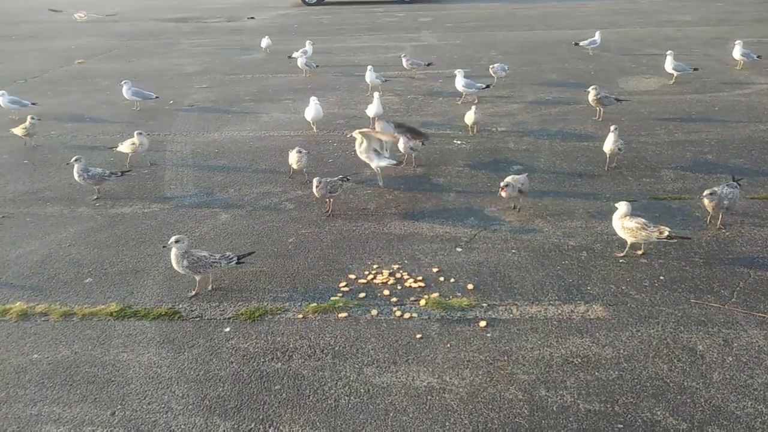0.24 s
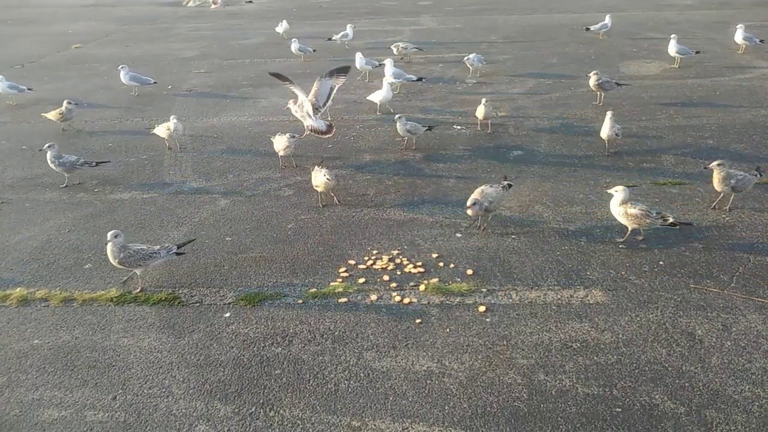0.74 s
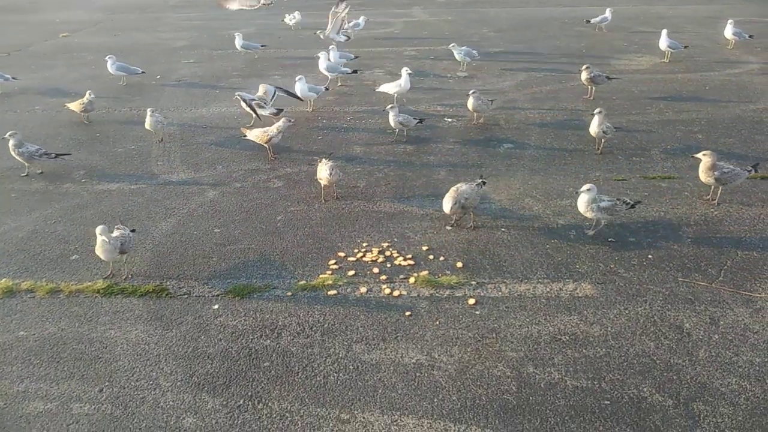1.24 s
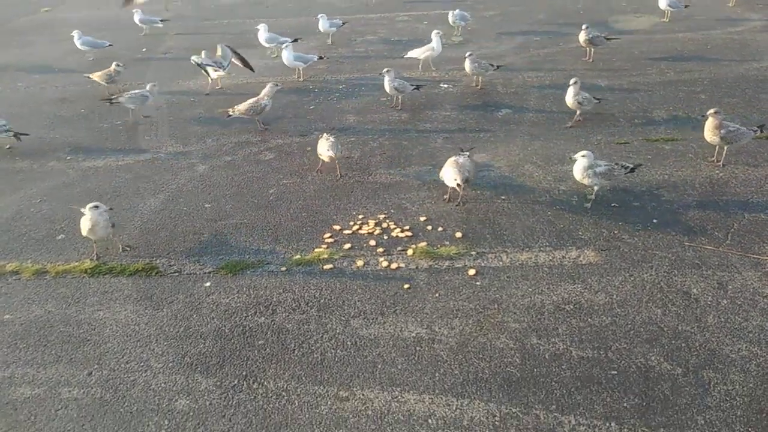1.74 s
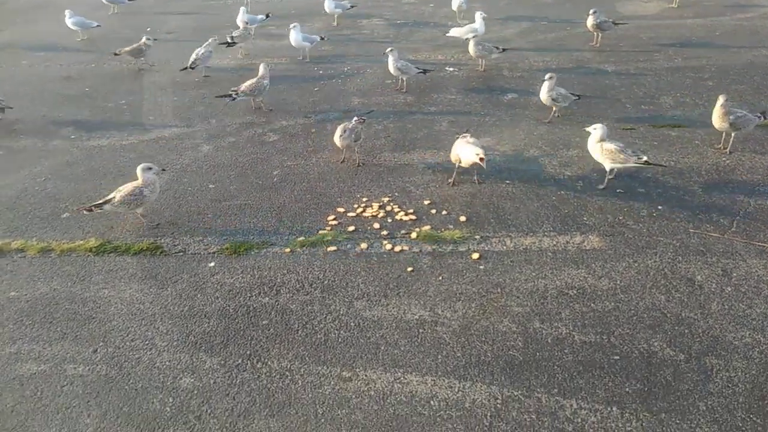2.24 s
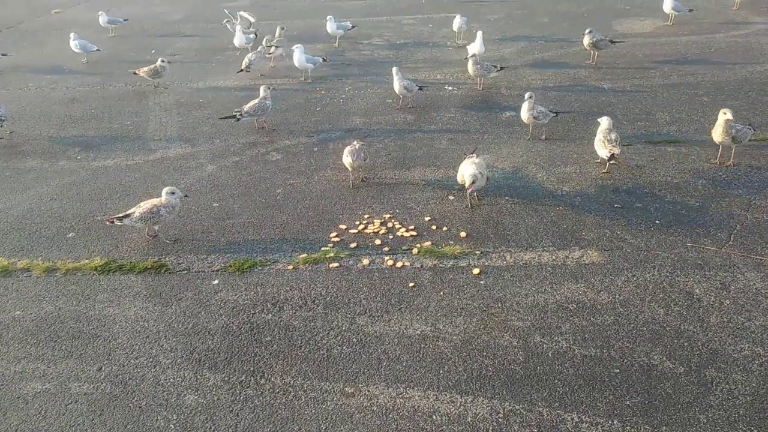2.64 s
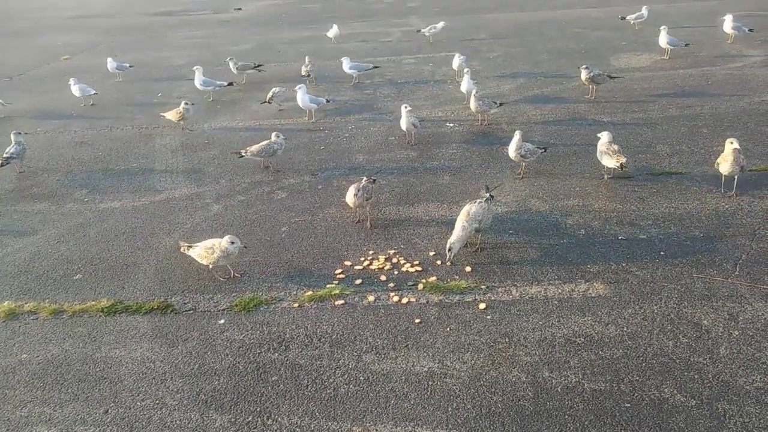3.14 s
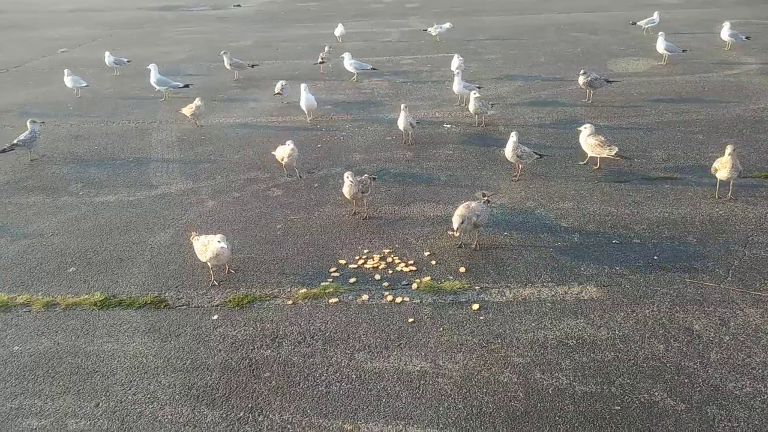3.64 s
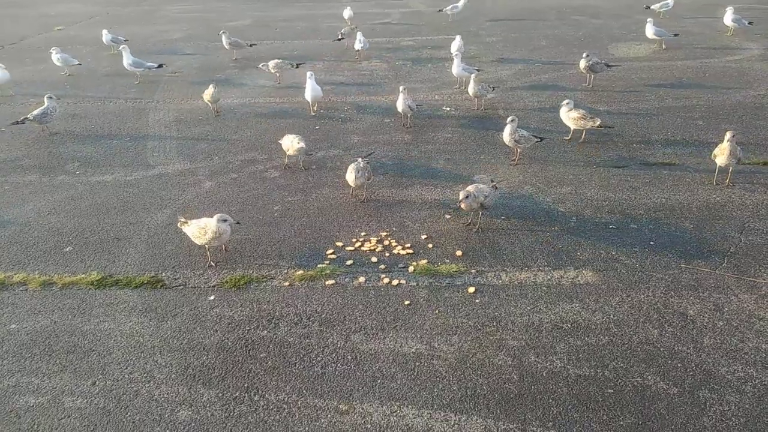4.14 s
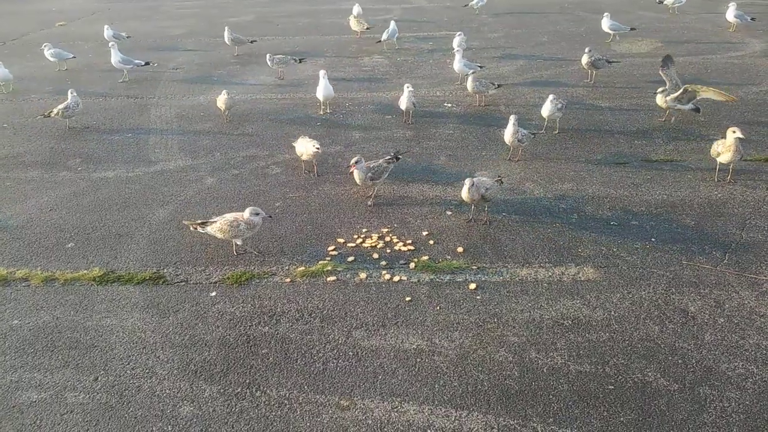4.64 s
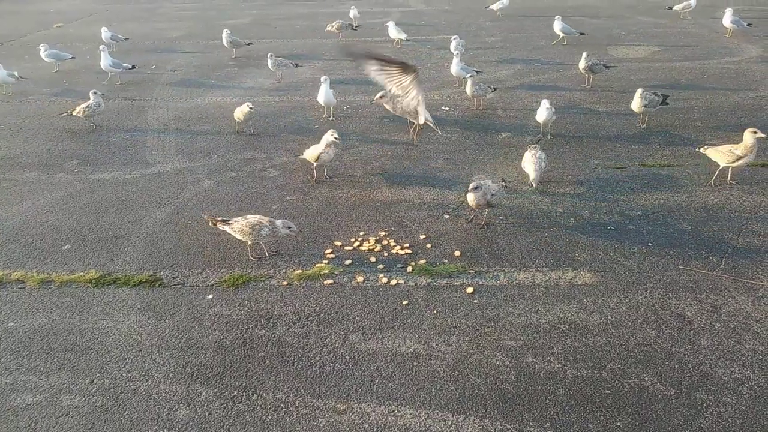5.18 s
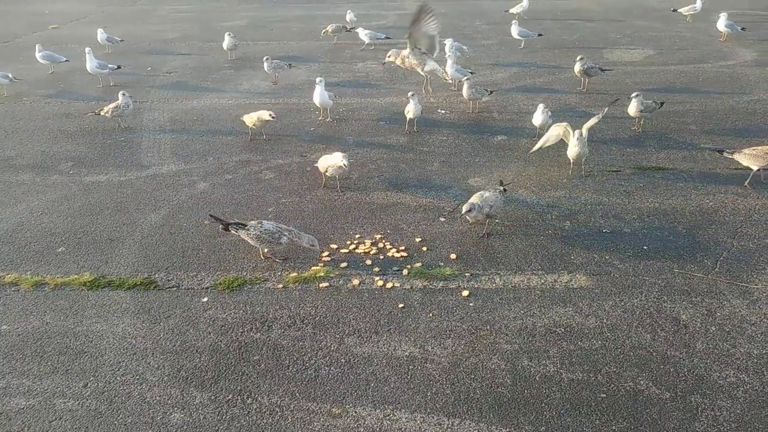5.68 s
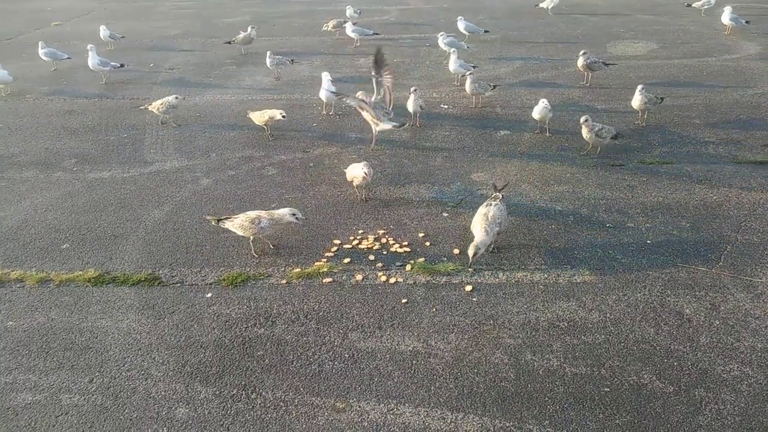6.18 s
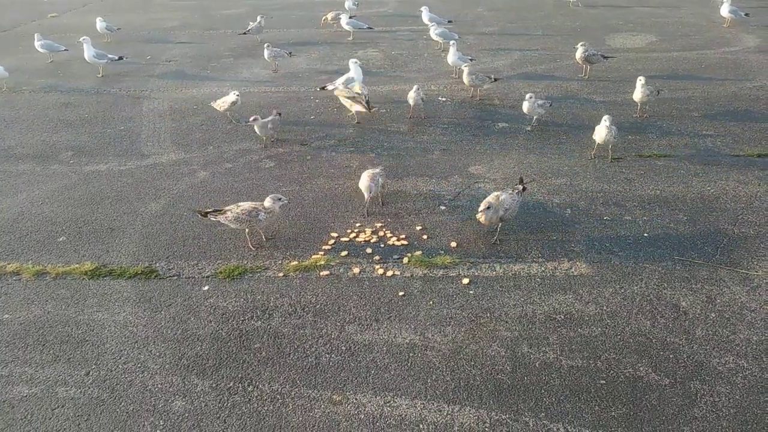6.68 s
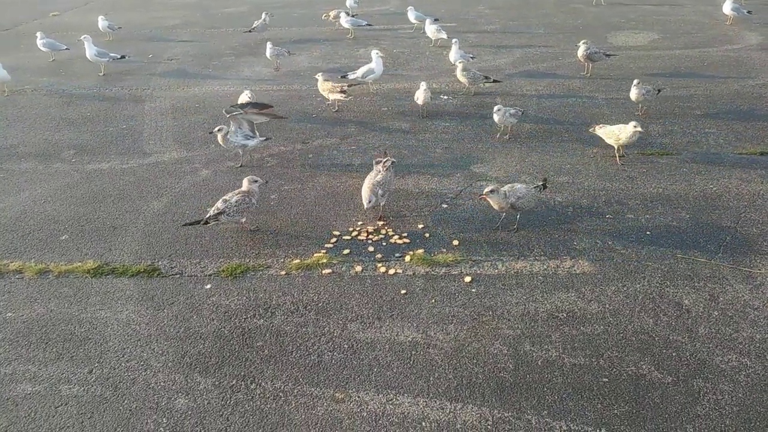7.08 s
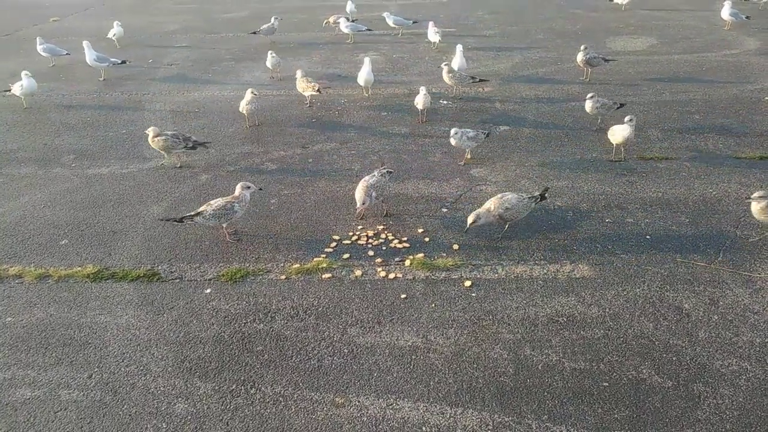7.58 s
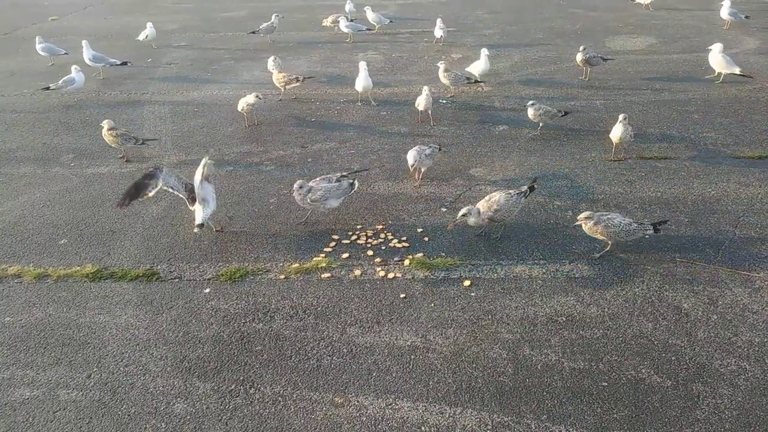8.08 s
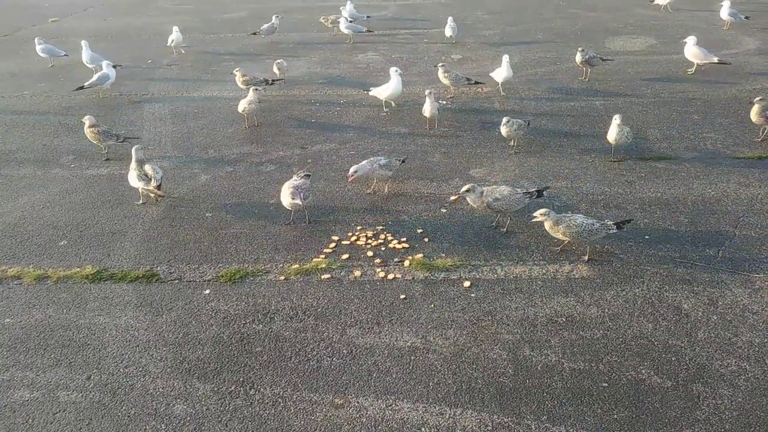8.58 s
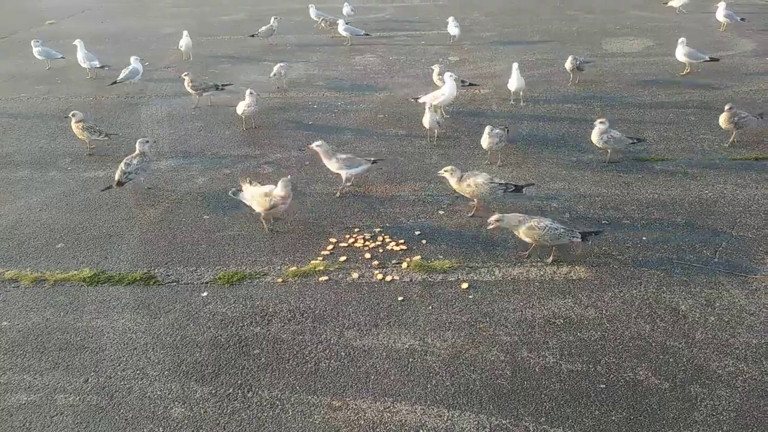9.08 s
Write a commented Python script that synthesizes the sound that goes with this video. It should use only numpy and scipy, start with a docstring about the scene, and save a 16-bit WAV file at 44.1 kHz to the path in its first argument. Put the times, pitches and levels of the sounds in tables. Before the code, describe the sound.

A flock of gulls squabbles close by, thin high gliding cries breaking into harsh squawks over low wind buffeting and distant traffic rumble.

```python
"""Thin gliding gull cries overlap and break into harsh squawks, close by, as a flock squabbles over food.
Each voice is a set of harmonics on a moving pitch; chance jolts in pitch and level make the squawks rough.
Decaying noise gives the echoes of the open tarmac and far buildings; more gulls call further off.
Filtered noise makes the wind that buffets the hand-held microphone and the rumble of distant traffic.
Quavering whistles and deep, hoarse calls join in later."""
import sys
import numpy as np
from scipy import signal
from scipy.fft import rfft, irfft, next_fast_len
from scipy.io import wavfile
from scipy.ndimage import uniform_filter1d, minimum_filter1d, map_coordinates

SR = 44100
rng = np.random.default_rng(int(sys.argv[2]) if len(sys.argv) > 2 else 0)


def persist_wave(psi):
    """Save psi, clipped to +-1, as 16-bit WAV."""
    counts = np.round(np.clip(psi, -1, 1) * 32767).astype(np.int16)
    wavfile.write(sys.argv[1], SR, np.atleast_2d(counts).T)


N = 411012
T = np.arange(N) / SR  # time in seconds
TOP_HZ = 15800  # the recorder cuts everything above this
SWELL_DB = 1  # cries, trills and croaks are this much weaker at their ends than in the middle

# How a throat and wide-open bill colour a voice. Each row: frequency in Hz, relative level in dB.
THROAT = [(700, -52), (1200, -28.5), (1750, 3.5), (3300, 7.5), (4200, 1.5), (5300, 6.5), (6400, -1.5),
          (8500, -26.5), (14000, -53)]


def undb(db):
    """Turn decibels into a gain."""
    return 10 ** (np.asarray(db) / 20)


def unit(x):
    """Scale a sound to an rms (average strength) of 1."""
    return x / np.sqrt(np.mean(x ** 2))


def colour(x, points):
    """Filter a sound by a curve through (Hz, dB) points, joined along a logarithmic pitch scale."""
    hz, db = np.transpose(points)
    size = next_fast_len(len(x))
    log_hz = np.log(np.arange(size // 2 + 1) * SR / size + 1)
    gain = undb(np.interp(log_hz, np.log(hz), db))
    return irfft(rfft(x, size) * gain, size)[:len(x)]


def wander(t, rate):
    """Smooth random curve with a spread near 1 that takes `rate` new values a second."""
    at = (t - t[0]) * rate
    values = rng.standard_normal(int(at[-1]) + 2)
    return map_coordinates(values, [at], order=2, mode="nearest")


def span(start, end, edge_s):
    """Sample numbers of a call, and a gate that opens and closes smoothly around its ends."""
    first = max(int((start - edge_s) * SR), 0)
    last = min(int((end + edge_s) * SR), N)
    i = np.arange(first, last)
    inside = np.minimum(T[i] - start, end - T[i]) / edge_s
    return i, .5 + .5 * np.sin(np.pi / 2 * np.clip(inside, -1, 1))


def turn(hz):
    """Phase of an oscillator that follows a pitch curve."""
    return 2 * np.pi * np.cumsum(hz) / SR


def course(t, start, end, first_hz, last_hz, arch_hz, db, crescendo_db):
    """Pitch and gain of one call: both glide from start to end and bow as the bird pushes in the middle."""
    along = np.clip((t - start) / (end - start), 0, 1)
    push = 1 - (2 * along - 1) ** 2  # 0 at the ends, 1 in the middle
    hz = first_hz + (last_hz - first_hz) * along + arch_hz * push
    waver = 1 + .0045 * wander(t, 30)
    gain = undb(db + crescendo_db * (along - .5) - SWELL_DB * (1.0 - push))
    return hz * waver, gain


def third_harmonic(hz, second_db):
    """Level of the 3rd harmonic against the 1st, in dB, set by where it falls in the bill's resonance."""
    # Each row: frequency of the 3rd harmonic in Hz, its level against the lower two together in dB.
    bill_resonance = [(4800, -22), (5350, 10.5), (5750, -4), (6150, -13), (7500, -26.5), (9500, -42),
                      (13000, -49)]
    against_lower_two = np.interp(3 * hz.mean(), *np.transpose(bill_resonance))
    return against_lower_two + 10 * np.log10(1 + undb(second_db) ** 2)


def cry(t, hz, second_db, third_db, low_rasp=0.0976):
    """The syrinx (voice organ) whistles a few harmonics and rattles on every fourth cycle, most when low."""
    phase = turn(hz * (1 + .003 * wander(t, 250)))
    full_and_low = hz.mean() < 2300 and second_db < 14
    rasp = low_rasp if full_and_low else .015
    rattle = rasp * (np.cos(phase / 4) * (1 + .5 * wander(t, 20)) + .28 * wander(t, 1800))
    gains = undb([0, second_db, third_db])
    gains = gains / np.linalg.norm(gains)
    voice = sum(g * np.sin(k * (phase + rattle)) for k, g in enumerate(gains, 1))
    for k in range(4, 7):  # the overtones die away with height
        overtone_gain = undb(np.minimum(26 - k * hz / 160, -24))
        fits = k * hz < SR / 2  # the sample rate cannot hold anything higher
        voice += overtone_gain * fits * np.sin(k * (phase + rattle))
    flicker = undb(1.713 * wander(t, 44.8))
    return np.sqrt(2) * voice * (1 + rattle) * flicker


def cries(edge_s=0.0047):
    """The near birds' clear cries, each one a bowed glide in pitch."""
    # Each row: start in seconds, end in seconds, first pitch in Hz, last pitch in Hz, arch of the pitch
    # in Hz, level in dB, crescendo in dB, 2nd harmonic against the 1st in dB.
    cry_list = [ (0, 0.059, 3298, 3368, 1.5, -15.5, -21.5, -29.5),
                (0.078, 0.095, 2336, 2828, -41, -15, 2.5, 10.5),
                (0.098, 0.132, 4134, 4020, -150, -14, 2.5, -18.5),
                (0.131, 0.202, 4185, 4274, 41.5, -14, -11.5, -27),
                (0.168, 0.22, 2010, 2082, -14, -19.5, -2.5, -11),
                (0.192, 0.657, 4255, 4111, 161, -24, -4, -19),
                (0.243, 0.349, 1885, 1836, 2, -11.5, -20.5, 7),
                (0.256, 0.371, 1980, 2001, -29, -16, 0, -5.5), (0.357, 0.398, 2495, 2702, -9, -11, 1.5, 4),
                (0.4, 0.448, 3352, 3256, -2.5, -15, -4.5, -34.5),
                (0.454, 0.475, 3301, 3013, -7, -11.5, -7.5, -7.5),
                (0.648, 0.726, 2654, 2882, 3, -19, -6.5, 0.5),
                (0.728, 0.851, 2025, 1989, -9.5, -15, -2, -7.5),
                (0.874, 1.014, 2018, 1891, -24, -16, -2, 3), (0.915, 1, 2389, 2644, 35, -18.5, -4.5, -10.5),
                (1.129, 1.332, 2075, 2020, -1, -14, 2, -16),
                (1.37, 1.497, 3310, 3408, 56.5, -23.5, 3, -8.5),
                (1.519, 1.559, 1795, 1749, -3, -12, 1.5, 14.5),
                (1.614, 1.828, 2029, 1998, -0.5, -16.5, -2.5, -2.5),
                (1.616, 1.727, 3789, 3933, 28, -17, 14, -40.5),
                (1.832, 1.888, 2574, 2702, -47.5, -14, 1.5, 8.5),
                (1.913, 1.978, 2881, 2745, 192.5, -8.5, -5, 10),
                (2.122, 2.329, 2003, 1960, -14.5, -21.5, -11, -7.5),
                (2.259, 2.299, 1651, 1691, -58, -11, -1, 10.5),
                (2.288, 2.453, 2528, 2623, 24, -31, -12.5, -2.5),
                (2.453, 2.521, 2529, 2344, 38, -31.5, -9, -6.5),
                (2.554, 2.572, 3151, 3220, -100, -11.5, -7.5, 9.5),
                (2.597, 2.625, 3112, 3339, -66, -11.5, -10, 2.5),
                (2.627, 2.646, 3366, 2958, -37, -9.5, 8.5, -9.5),
                (2.753, 2.996, 1955, 2155, 19.5, -28.5, -19, -6),
                (3.03, 3.47, 3859, 3519, 1, -41, 1.5, -30), (3.234, 3.276, 3012, 3058, -1.5, -38.5, -9, 22),
                (3.629, 3.677, 2580, 2629, 57.5, -8.5, 19, 3),
                (3.681, 3.748, 3302, 3008, -170, -20.5, -16, -16.5),
                (3.751, 3.852, 4270, 4387, -1.5, -20, -6, -36),
                (3.856, 3.997, 3790, 3064, 304, -29, -2, -16),
                (4.491, 4.561, 3360, 3254, -56.5, -18, 5, -9),
                (4.565, 4.658, 4020, 3880, -8, -25.5, 5, -12.5),
                (4.661, 4.816, 3867, 3598, 197, -15.5, 4, -24.5),
                (4.578, 4.619, 2562, 2684, -49.5, -8.5, 4, 2.5),
                (4.616, 4.945, 1942, 1832, -3, -28, 16, 17.5),
                (4.618, 4.643, 3430, 3257, -0.5, -14.5, 6, -40),
                (4.984, 5.011, 1634, 1784, -8.5, -22.5, 19.5, 9),
                (5.02, 5.17, 3110, 3257, -82.5, -13, -8, -9),
                (5.085, 5.139, 2650, 3004, 111.5, -9.5, 10, -4.5),
                (5.152, 5.610, 4236, 3432, -68.5, -12.5, 6.5, -19.5),
                (5.232, 5.274, 3390, 2988, 5.5, -14, -13.5, -18.5),
                (5.251, 5.369, 4546, 4343, -280, -17.5, 2, -21.5),
                (5.277, 5.291, 1751, 1490, -61.5, -23, 1, -4),
                (5.455, 5.479, 2885, 3001, 21.5, -7.5, -2.5, 3),
                (5.454, 5.61, 3125, 3362, 132.5, -14.5, 8, -4),
                (5.459, 5.494, 4380, 3770, -64, -14, 1.5, -32),
                (5.608, 5.616, 3383, 3097, 57, -17.5, -5, -12),
                (5.659, 5.676, 4535, 4475, -7, -20.5, -6.5, -18.5),
                (5.712, 5.719, 4640, 4640, 1, -13, -15.5, -28),
                (5.806, 5.985, 3184, 3280, 199, -18, -14, 5),
                (5.851, 5.92, 2039, 2214, 29.5, -3.5, 18, 11.5),
                (6.012, 6.029, 2495, 2765, -35.5, -5, -9, 5.5),
                (6.034, 6.082, 3524, 3466, -200, -10, -8, -20),
                (6.069, 6.204, 3932, 3727, 46.5, -14, 6, -23.5),
                (6.086, 6.282, 3487, 3433, 1.5, -13.5, 8, -20.5),
                (6.122, 6.157, 1825, 1872, -35, -10, 4.5, -2),
                (6.171, 6.282, 3320, 3404, 241.5, -9.5, 1.5, -9.5),
                (6.189, 6.234, 3826, 4780, 97, -16, -5.5, -32.5),
                (6.238, 6.401, 4740, 3927, 558.5, -11.5, -2.5, -34.5),
                (6.39, 6.421, 3458, 2897, -1, -14, -15.5, -9.5),
                (6.475, 6.603, 3078, 3277, 312, -17, -17, 9),
                (6.582, 6.624, 1927, 2283, -47.5, -10.5, 12.5, 7.5),
                (6.633, 6.847, 4019, 4253, -28, -19, -12.5, -23),
                (6.648, 6.801, 2733, 3170, -58.5, -19, 1.5, 3.5),
                (6.779, 6.824, 2702, 2502, 16, -15.5, -12, -6),
                (6.832, 6.876, 3617, 2672, -54.5, -22.5, -11.5, -3.5),
                (6.865, 6.949, 4485, 4130, -43, -20, -15, -27.5),
                (6.922, 6.944, 1738, 1947, 17.5, -17, 1, 14),
                (6.951, 7.106, 3198, 3368, -190, -14.5, -7.5, -13.5),
                (7.109, 7.443, 4272, 4107, 277, -20, 6.5, -24),
                (7.266, 7.338, 2821, 2641, -25.5, -19.5, 0.5, -13),
                (7.344, 7.504, 3380, 3205, 391, -23, -8.5, -4.5),
                (7.445, 7.47, 3156, 2857, 1.5, -16, -13.5, -9.5),
                (7.703, 7.739, 3650, 3300, -95.5, -22, 8.5, -16.5),
                (7.742, 7.842, 3918, 3794, -8, -9, -2, -20), (7.802, 8.105, 3053, 3345, 23, -16, -7, -18.5),
                (7.840, 7.996, 2437, 2375, -24, -23, -2, 11),
                (7.976, 8.003, 1800, 2198, -26.5, -14.5, 7.5, 17),
                (8.008, 8.114, 3867, 3552, -48, -2.5, 6, -18),
                (8.109, 8.214, 3321, 3092, 7.5, -13.5, 3.5, -15.5),
                (8.125, 8.238, 2195, 2403, 69, -16, 6, 14.5),
                (8.212, 8.251, 1772, 1493, -7, -24, -5.5, 12.5),
                (8.26, 8.31, 2019, 1775, 34, -17.5, 3, 26.5),
                (8.348, 8.454, 3537, 3080, -240, -26, 3.5, -13),
                (8.506, 8.574, 1950, 2016, -44, -13.5, -8.5, 15), (8.511, 8.57, 2458, 2363, 1, -13, 10, 2),
                (8.534, 8.598, 3234, 3390, -6.5, -14, -5.5, -20),
                (8.571, 8.605, 3132, 3037, -21.5, -14, 2.5, 7.5),
                (8.591, 8.968, 4408, 4282, 238.5, -15, 9.5, -60),
                (8.611, 8.713, 4129, 4014, 90.5, -16.5, -8.5, -31),
                (8.611, 8.956, 2369, 2193, -27.5, -19.5, -2, 9),
                (8.69, 8.868, 3860, 3338, -42, -27, -5.5, -13.5),
                (8.854, 8.866, 4330, 5520, -2.5, -15.5, -2.5, -34.5),
                (8.877, 8.974, 4176, 3984, -45, -9, -1, -28.5),
                (8.796, 8.965, 4395, 4200, 62.5, -18, -1, -50),
                (8.976, 9.045, 2542, 2579, 14.5, -14, 0.5, 30),
                (9.049, 9.158, 2059, 2062, 14, -18, -5.5, 33.5),
                (9.203, 9.331, 3186, 3530, 17.5, -15.5, -17, -22),
                (9.196, 9.323, 4396, 4575, 9, -12.5, 0, -35.5)]
    out = np.zeros(N)
    for start, end, *shape, second_db in cry_list:
        i, gate = span(start, end, edge_s)
        hz, gain = course(T[i], start, end, *shape)
        out[i] += gate * gain * cry(T[i], hz, second_db, third_harmonic(hz, second_db))
    return out


def buzz(t, hz, rough, lurch=0.017, doubling=1.0):
    """Driven too hard, the membranes lurch in pitch, slip at random and flicker into a doubled period."""
    phase = turn(hz * (1 + lurch * wander(t, 90)))
    slips = .115 * wander(t, 1100) + .19 * wander(t, 300)
    beat = doubling * wander(t, 260) * np.cos(phase / 2)
    voice = 0
    for k in range(1, int(TOP_HZ / hz.mean()) + 1):
        flicker = undb(4.71 * wander(t, 89.14))  # each harmonic has its own
        voice = voice + flicker * np.sin(k * (phase + rough * slips) + 2 * np.pi * rng.random())
    return voice * (1 + rough * beat)


def squawks(edge_s=.009, sag=0.08, fall_s=0.011, bill_spread=0.046):
    """Bursts start as rasp, clear into a voice and chirp downward; the bill opens differently each time."""
    # Each row: start in seconds, end in seconds, first pitch in Hz, last pitch in Hz (before the chirp),
    # level in dB, basic roughness (a plain number; the voice starts above it and clears to below it).
    squawk_list = [(0.002, 0.03, 2228, 2060, -23, 0.83), (0.094, 0.172, 1651, 1590, -22.5, 1.11),
                   (0.23, 0.258, 1894, 1827, -17.5, 1.23), (0.318, 0.401, 2073, 1975, -21, 1.43),
                   (0.472, 0.492, 1759, 1696, -15, 1), (0.559, 0.643, 1649, 1660, -19, 1.23),
                   (0.852, 0.905, 1980, 1993, -18, 1.41), (1.033, 1.101, 1796, 1701, -18, 1.8),
                   (1.091, 1.155, 1805, 1596, -21.5, 0.8), (1.312, 1.369, 2277, 2320, -18, 0.31),
                   (1.501, 1.526, 1758, 1810, -15.5, 2.15), (1.529, 1.608, 1786, 1679, -14.5, 1.34),
                   (1.968, 2.007, 1828, 1600, -14, 0.64), (2.05, 2.117, 1761, 1727, -17.5, 1.46),
                   (2.208, 2.256, 1926, 1812, -12.5, 1.3), (2.646, 2.673, 1739, 1816, -9.5, 1),
                   (2.684, 2.735, 1694, 1895, -10, 0.82), (2.729, 2.787, 1701, 1707, -14, 0.89),
                   (5.081, 5.143, 1395, 1472, -22, 0.07), (5.178, 5.29, 1845, 1752, -20.5, 1.69),
                   (5.28, 5.429, 1825, 1750, -30, 1.92), (5.426, 5.46, 1977, 1810, -11, 1.43),
                   (5.601, 5.626, 1903, 1609, -14.5, 1.33), (5.759, 5.81, 1807, 1958, -14.5, 1.15),
                   (5.843, 5.886, 2139, 2151, -13, 1.11), (5.956, 5.99, 1823, 1741, -19, 1.46),
                   (6.09, 6.174, 1844, 1963, -16, 1.34), (6.276, 6.299, 1884, 1566, -14, 1.2),
                   (6.395, 6.433, 1752, 1446, -15, 1.17), (6.435, 6.482, 1715, 2018, -18.5, 0.73),
                   (6.571, 6.598, 1899, 2008, -15.5, 1.46), (7.681, 7.723, 2330, 3053, -31, 0.65),
                   (7.771, 7.843, 1788, 1749, -18, 1.23), (8.119, 8.244, 2014, 1820, -21.5, 1.64),
                   (8.457, 8.516, 1813, 1751, -15.5, 1.34), (8.512, 8.615, 1781, 1828, -25, 0.65),
                   (8.883, 8.927, 2170, 1988, -25.5, 1.27), (8.967, 9.001, 2250, 1827, -22, 1.33),
                   (9.152, 9.195, 1942, 2020, -20, 1.57)]
    out = np.zeros(N)
    for start, end, first_hz, last_hz, db, rough in squawk_list:
        i, gate = span(start, end, edge_s)
        chirp = 1 - sag * np.exp(np.minimum((T[i] - end) / fall_s, 1))
        hz = np.linspace(first_hz, last_hz, len(i)) * chirp
        roughness = rough * np.linspace(1.35, .45, len(i))
        # shift all the throat's frequencies together
        throat = np.multiply(THROAT, [1 + bill_spread * rng.standard_normal(), 1])
        voice = buzz(T[i], hz, roughness) / np.hypot(1, roughness)
        out[i] += undb(db) * unit(gate * colour(voice, throat))
    return out


def far_flock(near, count=170, far_db=-14, rough=1.734):
    """Gulls further off join in with arched cries and short rasps whenever the near ones are excited."""
    out = np.zeros(N)
    for when, length, height, size in rng.random((count, 4)):
        start = when * T[-1]
        i, _ = span(start, start + 0.0595 + length / 5, edge_s=.01)
        arch = np.sin(np.linspace(0, np.pi, len(i)))
        hz = 1900 * (1 + height) * (1 + arch / 10)
        if height < .7:  # low voices break up, high ones stay clear
            voice = buzz(T[i], hz, rough) / 2
        else:
            voice = cry(T[i], hz, 0, -25.5)
        out[i] += size * arch * voice
    # they answer what they have just heard: the average looks back about a tenth of a second
    excitement = uniform_filter1d(np.abs(near), size=SR // 10, origin=SR // 21)
    return undb(far_db) * excitement * colour(out, THROAT)


def surroundings(x, near_t60_s=0.58, near_db=-21, far_t60_s=1.0, far_db=-30):
    """Open ground: a quick scatter off the tarmac, and fainter, longer echoes from cars and far walls."""
    t = T[:SR]
    tail = 0
    for t60, db in ((near_t60_s, near_db), (far_t60_s, far_db)):  # t60: time to fade by 60 dB
        fade = undb(-60 * t / t60) * (1 - np.exp(-t / .005))
        echoes = rng.standard_normal(SR) * fade
        tail = tail + undb(db) * echoes / np.linalg.norm(echoes)
    dull = signal.butter(2, 6500, fs=SR, output="sos")
    return signal.fftconvolve(x, signal.sosfilt(dull, tail))[:N]


def wind(gain_db=-1.5, eddies_db=-11):
    """Eddies (swirls of air) thump on the microphone; the stronger ones reach higher."""
    # Each row: time in seconds, level in dB before gain_db.
    gusts = [(0, -23.5), (.9, -21), (1.7, -23.5), (1.81, -13.5), (1.9, -25), (4.3, -27.5), (5.27, -32.5),
             (5.38, -14.5), (5.52, -23), (5.7, -18), (6.1, -17), (6.9, -24.5), (7.5, -28), (8.26, -34.5),
             (8.33, -17.5), (8.42, -26.5), (8.9, -22.5), (9.32, -28)]
    # The wind's tone. Each row: frequency in Hz, relative level in dB.
    wind_tone = [(25, -34), (70, 2), (120, 1.5), (200, -6), (350, -32), (800, -58.5), (4000, -57.5)]
    db = np.interp(T, *np.transpose(gusts)) + 3 * wander(T, 30)
    air = unit(colour(rng.standard_normal(N), wind_tone))
    band = signal.butter(2, [160, 320], "band", fs=SR, output="sos")
    small_eddies = unit(signal.sosfilt(band, rng.standard_normal(N)))
    eddies_gain = undb(eddies_db + (db - db.max()) / 3)
    return undb(db + gain_db) * (air + eddies_gain * small_eddies)


def traffic(drone_hz=480, drone_db=-48):
    """Noise for a distant road, heard at a slowly sinking level, over a narrow noise band as a steady drone."""
    # The rumble's tone. Each row: frequency in Hz, relative level in dB.
    rumble_tone = [(90, 1), (330, -18.5), (500, -13), (700, -12), (1600, -13), (2600, -27.5), (7000, -54.5),
                   (15000, -51)]
    # The rumble's level as heard, before small random changes. Each row: time in seconds, level in dB.
    rumble_level = [(0, -35), (3.5, -38.5), (5.2, -43.5), (7.4, -52.5)]
    db = np.interp(T, *np.transpose(rumble_level)) + wander(T, 3.0)
    rumble = unit(colour(rng.standard_normal(N), rumble_tone)) * undb(db)
    band = signal.butter(2, [drone_hz - 70, drone_hz + 70], "band", fs=SR, output="sos")
    drone = unit(signal.sosfilt(band, rng.standard_normal(N)))
    return rumble + undb(drone_db) * drone


def trills(edge_s=0.0058, second_db=-33):
    """Whistles whose pitch quavers up and down, while the level changes with each quaver."""
    # Each row: start in seconds, end in seconds, first pitch in Hz, last pitch in Hz, quavers per second,
    # quaver depth in Hz, level in dB, dip at each pitch crest in dB (a negative dip is a rise).
    trill_list = [(1.725, 1.906, 3959, 4042, 17.1, 110, -14.5, -1),
                  (2.288, 2.549, 3792, 4030, 15.64, 134, -15.5, 1.5),
                  (5.619, 6.034, 3679, 3470, 20.3, 123.5, -11.5, 11.5)]
    out = np.zeros(N)
    for start, end, first_hz, last_hz, rate, depth_hz, db, dip_db in trill_list:
        i, gate = span(start, end, edge_s)
        hz, gain = course(T[i], start, end, first_hz, last_hz, 0, db, 0)
        quaver = np.cos(2 * np.pi * rate * (T[i] - start))
        voice = cry(T[i], hz + depth_hz * quaver, second_db, third_harmonic(hz, second_db))
        dip = undb(-dip_db * (1 + quaver) / 2)
        out[i] += gate * gain * dip * voice
    return out


def croaks():
    """Deep, hoarse calls: the squawks' buzz in a lower register, drawn out."""
    # Each row: start in seconds, end in seconds, first pitch in Hz, last pitch in Hz, arch of the pitch
    # in Hz, level in dB, crescendo in dB, roughness (a plain number).
    croak_list = [(1.957, 2.302, 911, 762.6, -42.5, -32.5, 2.5, 1.34),
                  (3.467, 3.632, 1772, 1634, -170, -32, -8.5, 0.88),
                  (3.645, 4.07, 1328, 1157, -53, -31, -2, 1.2)]
    # How a deep caller's throat colours the voice. Each row: frequency in Hz, relative level in dB.
    deep_throat = [(500, -25.5), (800, 6), (1300, 0), (2000, -3), (3500, -1.5), (5200, -1.5), (8500, -39.5),
                   (14000, -58)]
    out = np.zeros(N)
    for start, end, *shape, rough in croak_list:
        i, gate = span(start, end, edge_s=.025)
        hz, gain = course(T[i], start, end, *shape)
        voice = buzz(T[i], hz, rough, lurch=0.012, doubling=0.49)
        out[i] += gate * gain * unit(colour(voice, deep_throat))
    return out


def scene():
    """Birds, their echoes, wind and road."""
    near = cries() + squawks() + trills() + croaks()
    birds = near + far_flock(near)
    return (birds + surroundings(birds) + wind() + traffic())[None]


def record(dry):
    """A fast limiter holds the loudest peaks near 0.92; the recorder cuts the top."""
    peak = -minimum_filter1d(-np.abs(dry), size=129)  # largest value nearby
    gain = uniform_filter1d(np.minimum(1, .92 / (peak + 1e-9)), size=129)
    top_cut = signal.ellip(8, .2, 70, TOP_HZ, fs=SR, output="sos")
    return signal.sosfilt(top_cut, dry * gain)


dry = scene()
out = record(dry)
persist_wave(out)
```